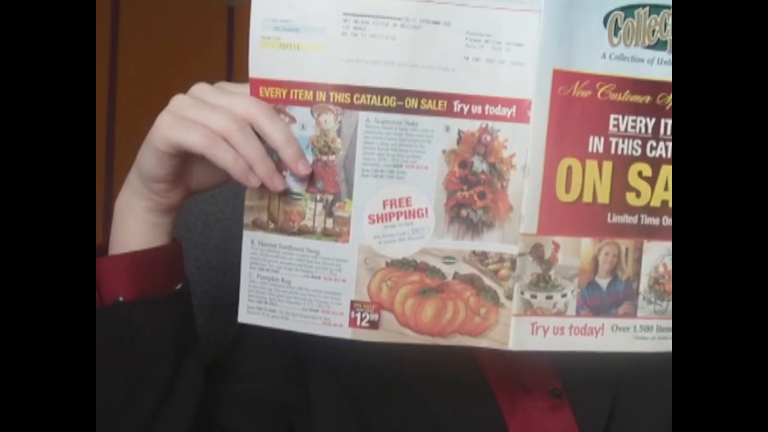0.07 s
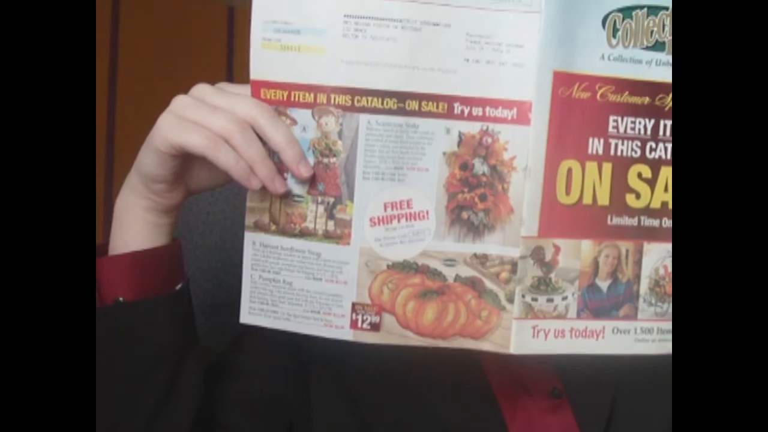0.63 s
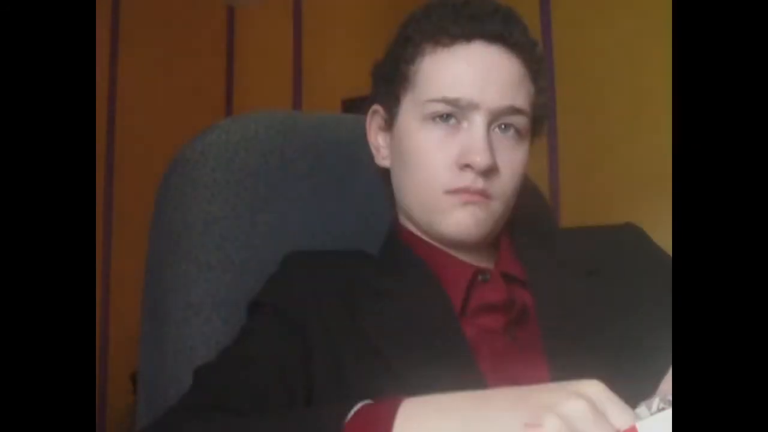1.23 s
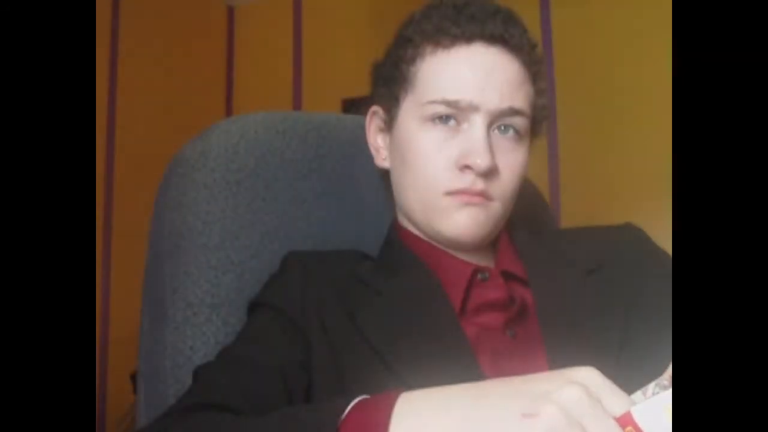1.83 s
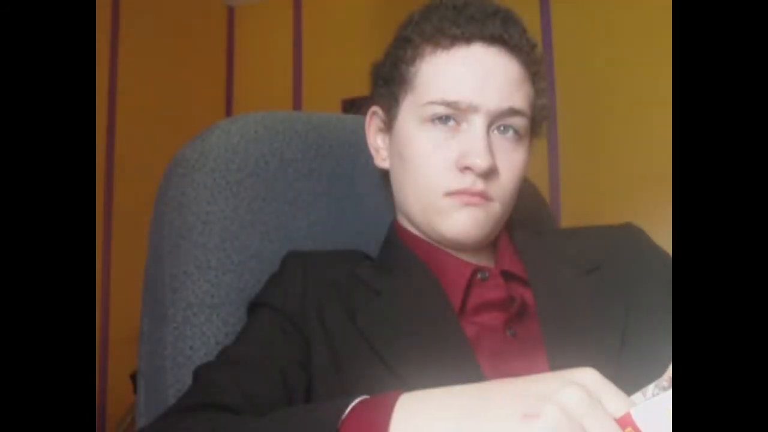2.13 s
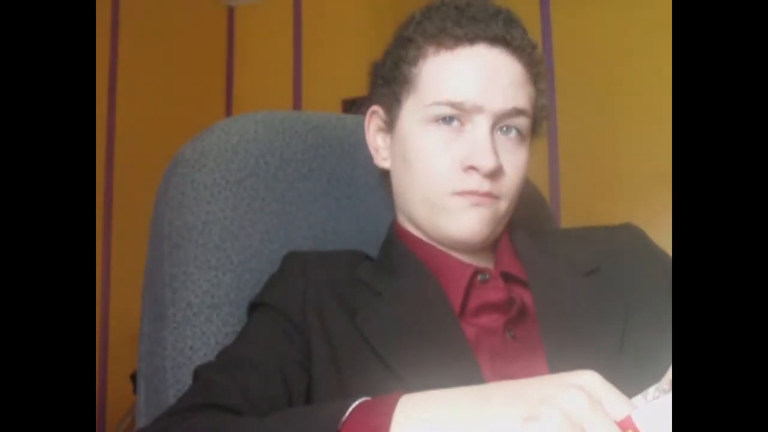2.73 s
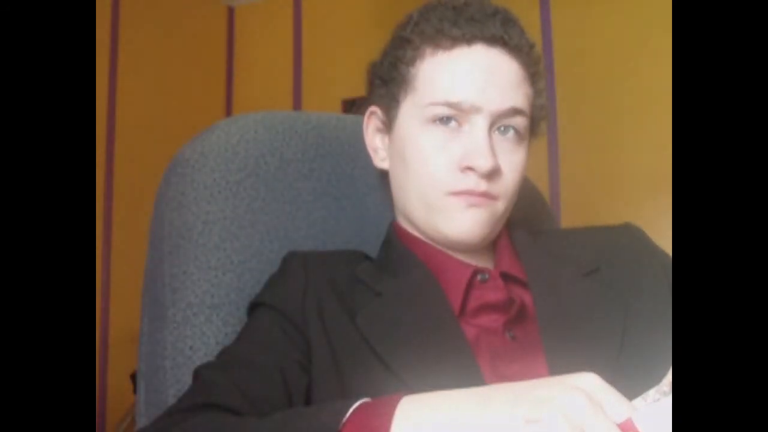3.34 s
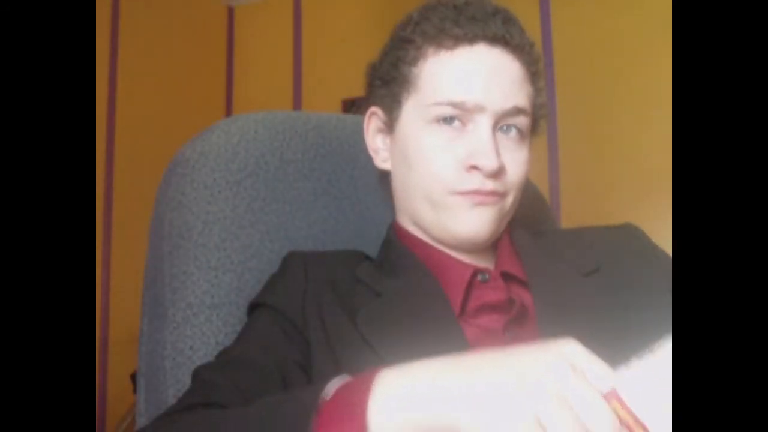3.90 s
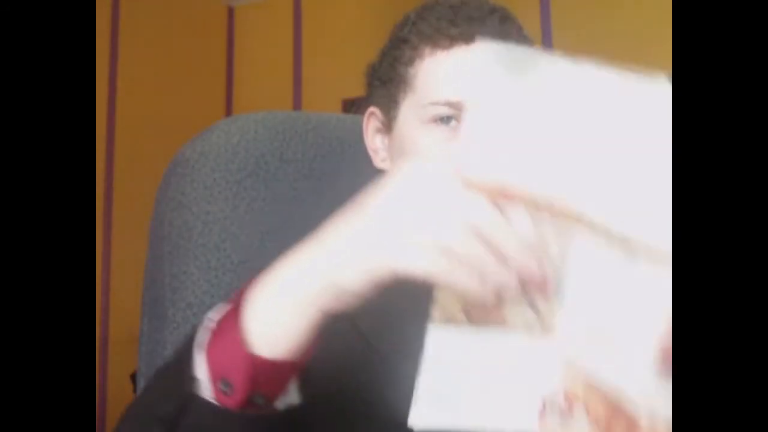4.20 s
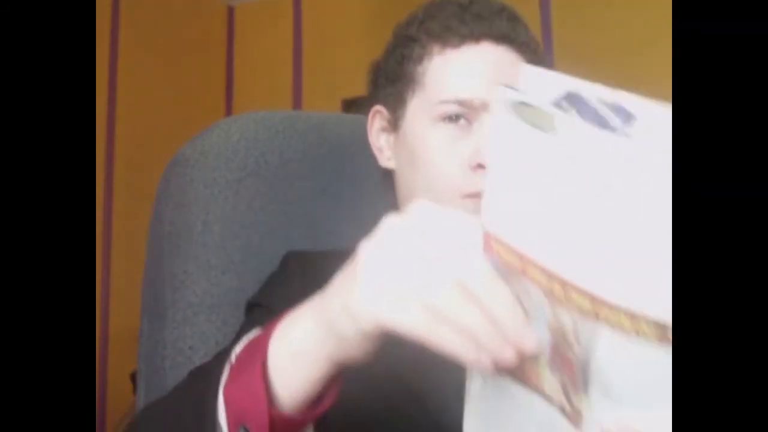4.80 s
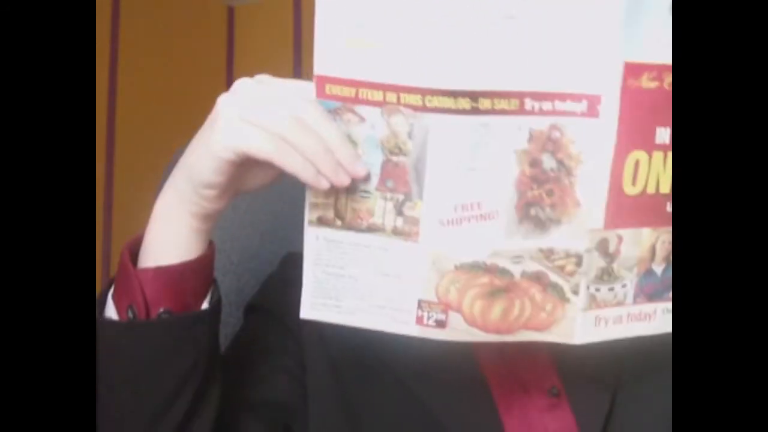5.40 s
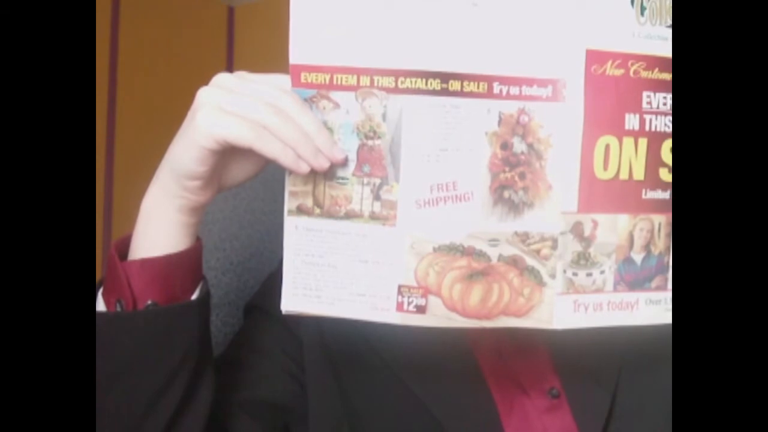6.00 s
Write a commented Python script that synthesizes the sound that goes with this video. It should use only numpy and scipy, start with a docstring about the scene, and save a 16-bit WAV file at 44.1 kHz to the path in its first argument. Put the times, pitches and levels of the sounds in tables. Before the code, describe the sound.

Close pages crinkle briefly, pause, then get shaken open with dry ticks and a sharp snap over steady electrical hum.

```python
"""A paper catalog is lowered to the lap, lifted again and shaken open, close to a small desk microphone.
Its pages crackle as they bend and hiss as they slide, and creases buckle with dry ticks.
Once, the sheets snap taut with a crack that overloads the microphone.
The room adds a short echo, and mains hum and a computer fan run underneath."""
import sys
import numpy as np
from scipy import signal
from scipy.fft import rfft, irfft
from scipy.io import wavfile
from scipy.ndimage import uniform_filter1d

SR = 44100
rng = np.random.default_rng(int(sys.argv[2]) if len(sys.argv) > 2 else 0)


def master(y):
    """Save y as 16-bit WAV."""
    cut = np.clip(np.atleast_2d(y).T, -1, 1)
    pcm = np.round(cut * 32767)  # scale
    wavfile.write(sys.argv[1], SR, pcm.astype(np.int16))


N = 266893
T = np.arange(N) / SR

# Creases giving way. Each row: start in seconds, level in dB, pitch in Hz, treble limit in Hz.
CREASE_TICKS = [(0.987, -49, 5000, 9000), (1.1337, -27.5, 2280, 7100), (1.211, -38, 9900, 11000),
                (1.2425, -35.5, 2270, 8040), (1.2699, -37, 1280, 5500), (1.2788, -41.5, 2330, 5500),
                (1.673, -53, 1710, 5500), (1.811, -54, 2000, 4230), (2.9405, -48, 3700, 4500),
                (3.1075, -49, 3430, 4500), (3.3748, -48, 3500, 4500), (3.9508, -43, 1630, 4000),
                (3.957, -45, 3870, 6000), (4.146, -37.5, 2450, 12000), (4.152, -36.5, 4260, 7000),
                (4.2136, -32.5, 10700, 13000), (4.2207, -40, 11000, 13000), (4.3021, -32, 1940, 5400),
                (4.3715, -22.5, 8760, 12800), (4.3784, -26, 8060, 12000), (4.391, -32.5, 8720, 12000),
                (4.456, -26, 2200, 5500), (4.505, -32, 4550, 12000), (4.525, -13, 8490, 11100),
                (4.5286, -22, 1800, 12000), (4.5324, -17.5, 1315, 9000), (4.5859, -16, 6150, 8450),
                (4.597, -31, 4220, 9000), (4.625, -26, 9900, 14000), (4.6285, -34, 6400, 12000),
                (4.6342, -36, 4130, 12000), (4.6455, -19.5, 7000, 10000), (4.78, -30, 1230, 12000),
                (4.7908, -31, 1300, 8100), (4.8278, -38, 2580, 2800), (4.834, -37.5, 1700, 3500),
                (4.8963, -40.5, 1580, 2800), (4.9116, -44, 1300, 3200), (4.926, -41, 1660, 9900),
                (4.9425, -42, 2100, 4500), (5.254, -39, 4220, 5400), (5.2812, -32.5, 1170, 1690),
                (5.2835, -28.5, 3800, 4600), (5.7443, -53, 3900, 5500)]
# The hands moving the pages. Each row: start and length in seconds, bending and sliding levels in dB.
HAND_MOVES = [(1.134, 0.017, -52.5, -61), (1.18, 0.069, -57, -51), (1.264, .035, -47.5, -50.5),
              (1.312, .035, -55.5, -60), (1.44, .06, -82, -66), (2.92, 0.49, -59, -67.5),
              (3.948, 0.025, -51, -57), (3.978, .27, -59.5, -56.5), (4.243, .012, -49, -62),
              (4.3, .045, -52, -58), (4.385, .012, -46.5, -42), (4.455, 0.034, -49, -51),
              (4.494, .012, -41, -49.5), (4.543, .12, -39, -48), (4.775, .011, -37.5, -56),
              (4.9, .03, -59.5, -67), (5.11, 0.02, -61.5, -59.5), (5.16, 0.28, -59.5, -67.5)]
# What rings on after the snap. Each row: pitch in Hz, starting level in dB, seconds to fade by 60 dB.
SNAP_RINGS = [(258, -34, .2), (380, -21, 0.15), (530, -39.5, 0.31), (949, -43, 0.22), (1230, -28, .2),
              (1415, -31, 0.15), (1733, -27, 0.14)]
# The tone of each paper sound and of the room's air. Each row: frequency in Hz, relative level in dB.
CREASE_TONE = [(100, -25), (500, -4), (800, -6.5), (1250, 5), (1800, 1.5), (2400, 1.5), (3200, 0),
               (4200, 1.5), (7000, -2.5), (9000, -2), (11500, -1), (15000, -7)]
BEND_TONE = [(150, -31), (350, 3), (700, 2), (1050, 1), (1280, 2.5), (1550, 1.5), (2400, 0), (4500, -7),
             (7000, -9.5), (14000, -32.5)]
SLIDE_TONE = [(1500, -17.5), (4000, 1.5), (7000, 0), (10000, 3.5), (12500, -7), (15000, -13)]
CRACK_TONE = [(30, -9.5), (60, -8), (140, -6.5), (240, 10.5), (450, 5), (800, 0), (1050, -9), (1600, 4.5),
              (2300, 6), (3400, 3), (4200, 5.5), (5500, 1), (8500, 4.5), (11000, -0.5), (15000, -12)]
FLAP_TONE = [(120, -7.5), (240, 2), (550, -10.5), (900, 4.5), (1300, 1.5), (1750, 4), (2600, -15.5),
             (4000, -3), (7000, -13), (11000, -23), (15000, -30.5)]
AIR_TONE = [(12, -15), (25, -4), (50, 1), (75, -8.5), (140, -9.5), (190, -13), (260, -15.5), (430, -21),
            (600, -23.5), (900, -25), (1300, -29.5), (1900, -28.5), (2700, -34.5), (4400, -31),
            (6000, -38.5), (10000, -41.5), (13000, -49.5), (15500, -49.5)]
# Hum from the mains, drive and fan. Each row: pitch in Hz, level in dB, size of its waver in dB.
HUM_TONES = [(57.3, -58, -1), (117.7, -55.5, 2.5), (176.5, -54, 2), (237.6, -71.5, 3), (807.5, -65.5, 1.5)]
# Fan whirr and a faint whine. Each row: centre frequency in Hz, width in Hz, level in dB.
FAN_BANDS = [(418, 14, -68), (780, 21, -68.5), (833.6, 14, -75), (11970, 130, -80.5)]
# The background steps louder and softer. Each row: start in seconds, level change in dB.
BACKGROUND_STEPS = [(0, -3), (.11, 2), (.67, 1), (1.37, -1.5), (1.75, -3.5), (2.32, 0.6), (2.88, 3),
                    (3.44, 2.25), (4.85, -0.5), (5.11, 2), (5.65, 0.5)]

TOP_HZ = 15300  # the microphone cuts the treble above this


def crease_ticks(ring_s=0.00085, flutter_s=0.0086, flutter_db=-18.5):
    """Each crease flips in about a millisecond, small stiff ones brightest; the sheet flutters on."""
    out, t = np.zeros(N), T[:SR // 16]
    for start_s, level_db, pitch_hz, top_hz in CREASE_TICKS:
        ring = np.exp(-t / (ring_s * (7000 / top_hz) ** 0.69))  # duller ticks ring longer
        flutter = undb(flutter_db) * np.exp(-t / flutter_s)
        force = rng.choice([-1, 1], len(t)) * (ring + flutter)
        force[0] *= undb(4)  # a sharp first edge
        tick = butterworth(force, 1, 0.77 * pitch_hz, "high")
        tick = butterworth(tick, 3, top_hz, "low")
        # the patch of paper around the crease gives the tick its pitch
        tick += undb(6) * resonate(tick, pitch_hz, 0.14 * pitch_hz)
        # set the level as if all the tick's energy fell within one millisecond
        tick *= undb(level_db) * np.sqrt(SR / 1000) / np.linalg.norm(tick)
        add(out, start_s, tick)
    return colour(out, CREASE_TONE)


def sheet_snap(start_s=4.6703, hold_s=0.008, fade_s=0.0062, push_s=0.002, backflow_s=0.007, flap_s=0.03):
    """The open pages push air ahead of them, crack taut, then flap and ring out."""
    t = T - start_s
    age = np.maximum(t, 0)
    # the crack lasts while the tension runs across the pages
    tension = (t > 0) * np.exp(-np.maximum(t - hold_s, 0) / fade_s)
    crack = undb(-6.5) * colour(rng.standard_normal(N) * tension, CRACK_TONE)
    # pressure builds in front of the sheet, then air rushes back behind it
    backflow = undb(-1) * age / backflow_s * np.exp(-age / backflow_s)
    push = undb(-12) * (np.exp(-np.abs(t) / push_s) - backflow)
    # loose pages slap each other for a moment
    slaps = fibre_slips(per_second=7000, spread_db=2) * (t > 0) * np.exp(-age / flap_s)
    flap = undb(-17) * colour(slaps, FLAP_TONE)
    ring = sum(undb(db) * np.sin(2 * np.pi * hz * age) * die_away(age, ring_s)
               for hz, db, ring_s in SNAP_RINGS)
    return crack + push + flap + ring


def page_rustle():
    """Bending pages crackle in the middle range while their faces slide with a fine hiss."""
    bending, sliding = np.zeros(N), np.zeros(N)
    for start_s, length_s, bend_db, slide_db in HAND_MOVES:
        motion = hand_move(start_s, length_s)
        bending = np.maximum(bending, motion * undb(bend_db))
        sliding = np.maximum(sliding, motion * undb(slide_db))
    crackle = unit(colour(crinkles(), BEND_TONE)) * bending
    hiss = colour(fibre_slips(per_second=15000, spread_db=0.5), SLIDE_TONE) * sliding
    return crackle * undb(2 * drift(per_second=100)) + hiss * undb(1.2 * drift(per_second=59))


def hand_move(start_s, length_s, rise_s=0.0049, fall_s=0.026):
    """One move of the hands swells, holds and dies away."""
    ease_s = 0.13 * length_s  # longer moves start and stop more gently
    before = np.maximum(start_s - T, 0)
    after = np.maximum(T - start_s - length_s, 0)
    return np.exp(-before / (rise_s + ease_s) - after / (fall_s + ease_s))


def crinkles():
    """Patches of paper of many sizes pop at random, each ringing briefly at its own pitch."""
    return sum(resonate(fibre_slips(per_second=370, spread_db=3.5), hz, 0.31 * hz)
               for hz in np.geomspace(250, 9000, 18))


def fibre_slips(per_second, spread_db):
    """Paper fibres slip over each other with tiny clicks: many weak, a few strong."""
    strength = undb(spread_db * np.minimum(rng.exponential(size=N), 3))
    slipping = rng.random(N) < per_second / SR
    return unit(slipping * strength * rng.uniform(-0.99, 1, N))


def room_echo(x, level_db=-15.5, ring_s=0.21, treble_ring_s=0.15, split_hz=4500, build_s=0.0025):
    """The desk and walls add a short echo whose treble dies first."""
    t = T[:SR // 2]
    low = butterworth(rng.standard_normal(len(t)), 2, split_hz, "low")
    high = butterworth(rng.standard_normal(len(t)), 2, split_hz, "high")
    tail = low * die_away(t, ring_s) + high * die_away(t, treble_ring_s)
    tail *= 1 - np.exp(-t / build_s)
    return x + undb(level_db) * signal.fftconvolve(x, tail / np.linalg.norm(tail))[:N]


def hum_and_fan(air_db=-49, drift_hz=0.63):
    """Air noise, wavering hum and fan whirr all step up and down in level together."""
    air = unit(colour(rng.standard_normal(N), AIR_TONE))
    out = undb(air_db) * air * undb(0.71 * drift(per_second=24))
    for hz, db, waver_db in HUM_TONES:
        phase = 2 * np.pi * np.cumsum(hz + drift_hz * drift(per_second=4.4)) / SR
        out += undb(db) * unit(np.sin(phase) * undb(waver_db * drift(per_second=7)))
    for hz, width_hz, db in FAN_BANDS:
        out += undb(db) * unit(resonate(rng.standard_normal(N), hz, width_hz))
    starts_s, steps_db = np.transpose(BACKGROUND_STEPS)
    held_db = steps_db[np.searchsorted(starts_s[1:], T)]
    return out * undb(uniform_filter1d(held_db, SR // 60))


def undb(db):
    """Turn decibels into a number to multiply by."""
    return 10 ** (np.asarray(db) / 20)


def unit(x):
    """Scale a sound so that its average power is 1."""
    return x / np.sqrt(np.mean(x ** 2))


def die_away(t, ring_s):
    """A fade that falls by 60 dB in ring_s seconds."""
    return np.exp(-np.log(1000) * t / ring_s)


def drift(per_second):
    """A smooth random wander, mostly between -1 and 1."""
    points = rng.standard_normal(2048)
    path = np.interp(T * per_second, np.arange(len(points)), points)
    return uniform_filter1d(path, int(SR / per_second / 2) + 1) * np.sqrt(2)


def colour(x, tone, size=16384):
    """Shape a sound's bass and treble to follow a tone table; white noise keeps its power."""
    hz, db = np.transpose(tone)
    grid_hz = np.maximum(np.fft.rfftfreq(size, 1 / SR), 1)
    gains = undb(np.interp(np.log(grid_hz), np.log(hz), db))
    # these steps make the filter ring only after a click, never before it
    cepstrum = irfft(np.log(gains))
    cepstrum[1:size // 2] *= 2
    cepstrum[size // 2 + 1:] = 0
    response = irfft(np.exp(rfft(cepstrum)))
    return signal.fftconvolve(x, response / np.linalg.norm(response))[:len(x)]


def resonate(x, hz, width_hz):
    """Keep a band around one pitch; the narrower it is, the longer it rings."""
    angle = 2 * np.pi * hz / SR
    damping = np.sin(angle) * width_hz / hz / 2
    return signal.lfilter([damping, 0, -damping], [1 + damping, -2 * np.cos(angle), 1 - damping], x)


def butterworth(x, steepness, edge_hz, side):
    """Keep the "low" or the "high" side of a frequency and fade out the other."""
    return signal.sosfilt(signal.butter(steepness, edge_hz, side, fs=SR, output="sos"), x)


def add(out, start_s, sound):
    """Mix a sound in at its start time."""
    i = int(start_s * SR)
    out[i:i + len(sound)] += sound[:N - i]


def scene():
    """The catalog in its room, over the hum and the fan."""
    paper = crease_ticks() + sheet_snap() + page_rustle()
    return (room_echo(paper) + hum_and_fan())[None]


def record(dry):
    """The microphone flattens the loudest peaks and cuts the highest treble."""
    ceiling = 0.54
    fine = signal.resample_poly(dry, 2, 1, axis=-1)  # twice the sample rate, for a smooth overload
    flattened = fine / (1 + (fine / ceiling) ** 6) ** (1 / 6)
    treble_cut = signal.firwin(255, TOP_HZ, fs=2 * SR, window=("kaiser", 10))
    return signal.fftconvolve(flattened, treble_cut[None], mode="same")[:, ::2]


dry = scene()
out = record(dry)
master(out)
```